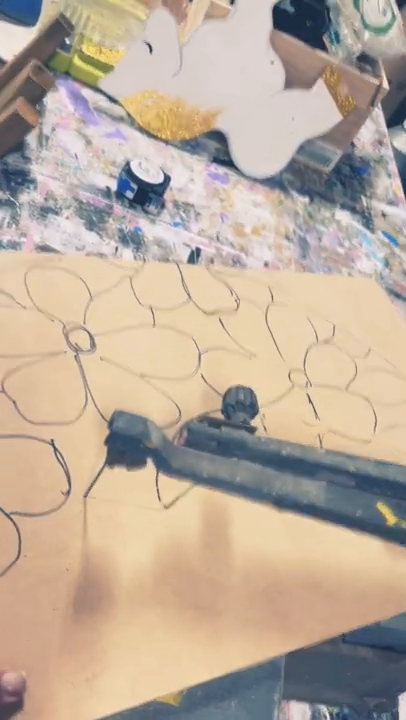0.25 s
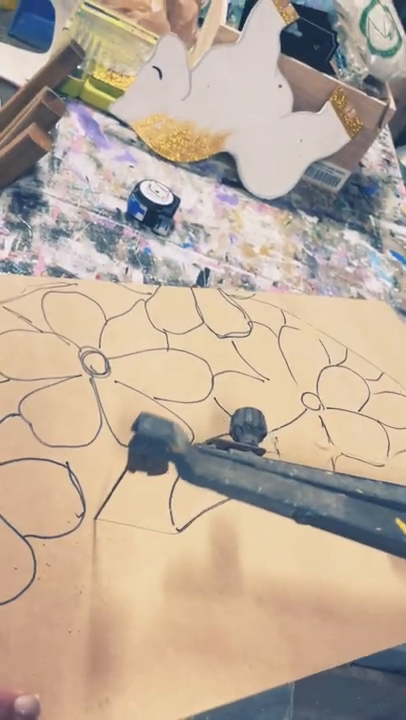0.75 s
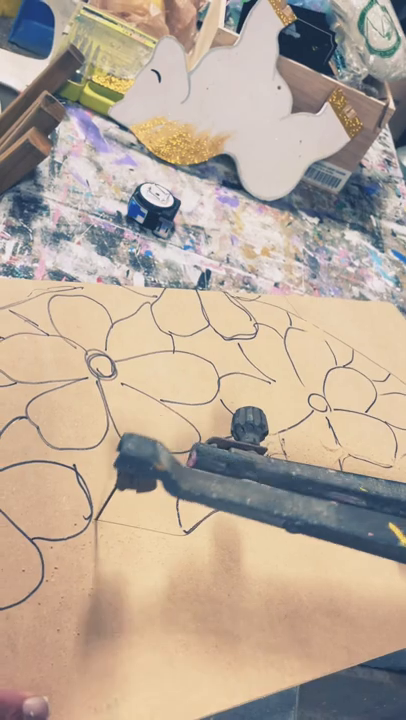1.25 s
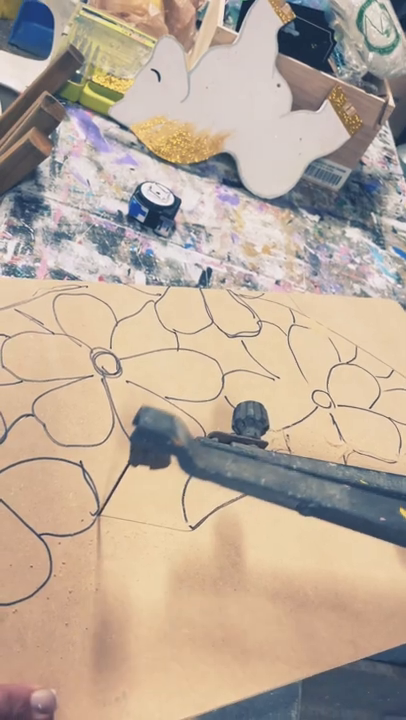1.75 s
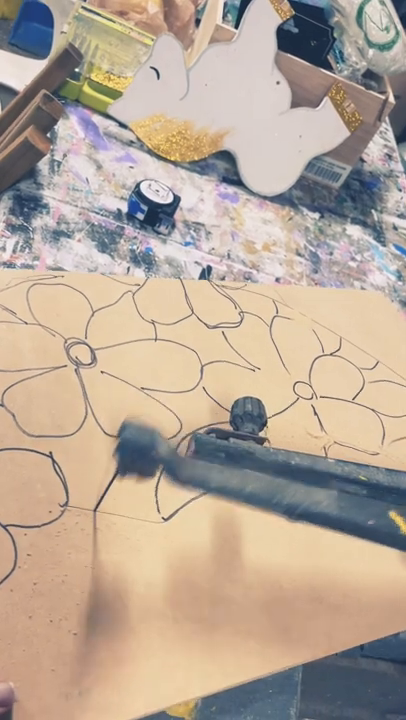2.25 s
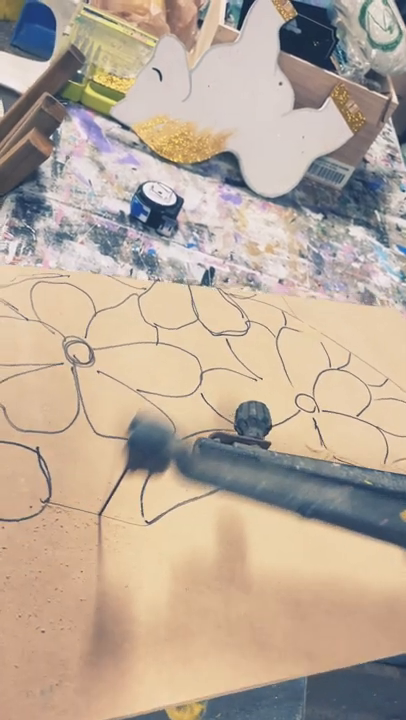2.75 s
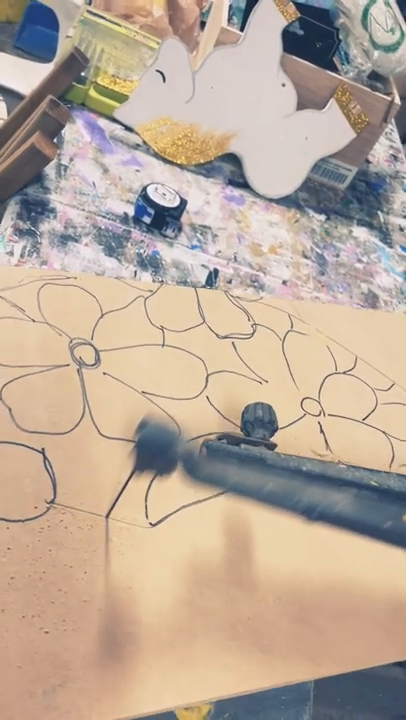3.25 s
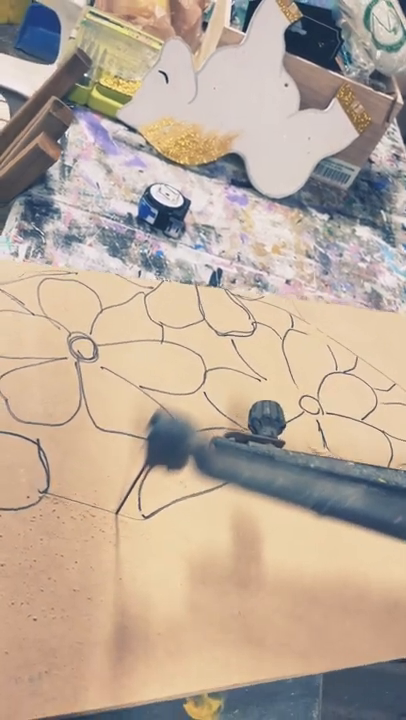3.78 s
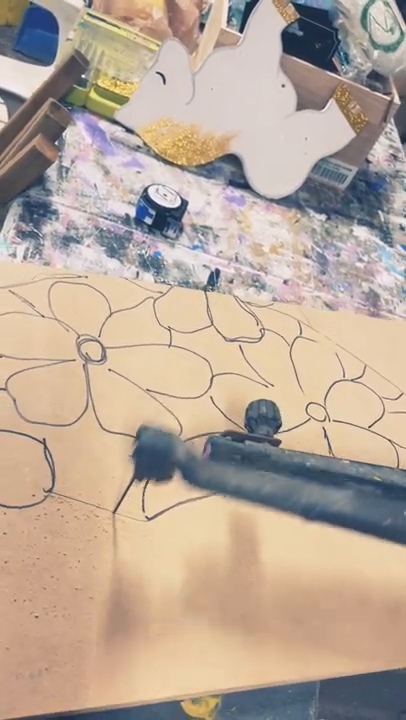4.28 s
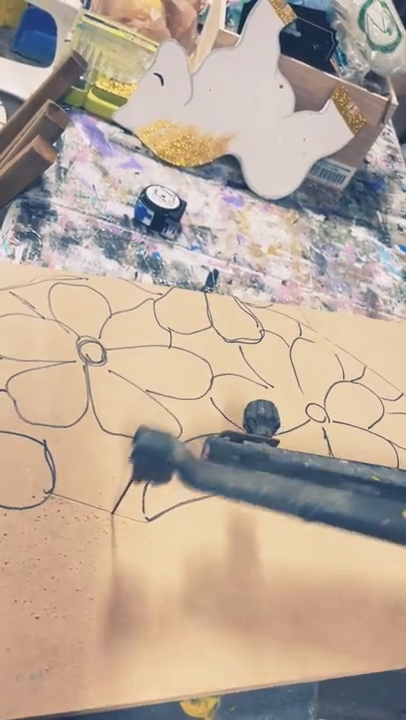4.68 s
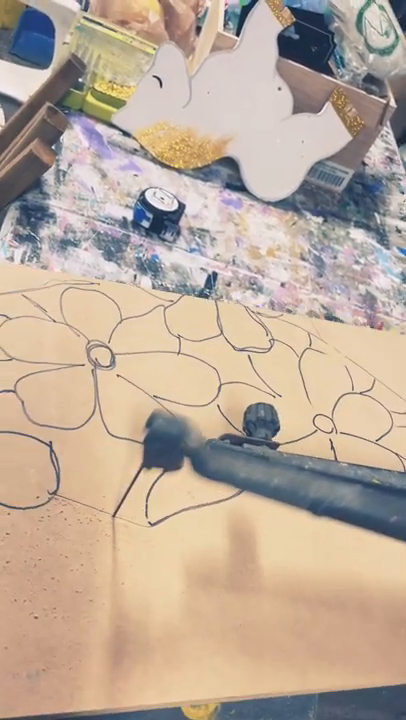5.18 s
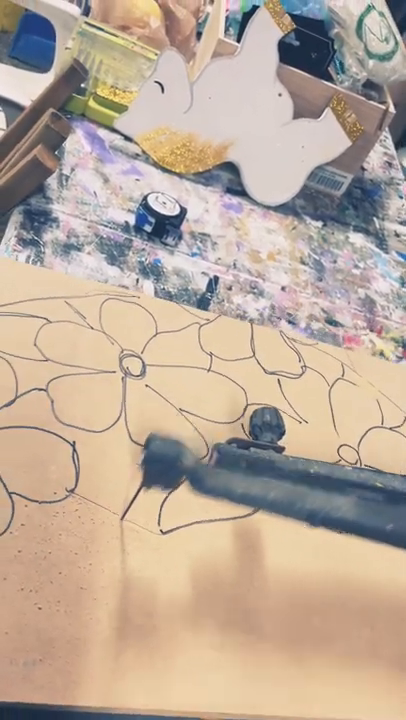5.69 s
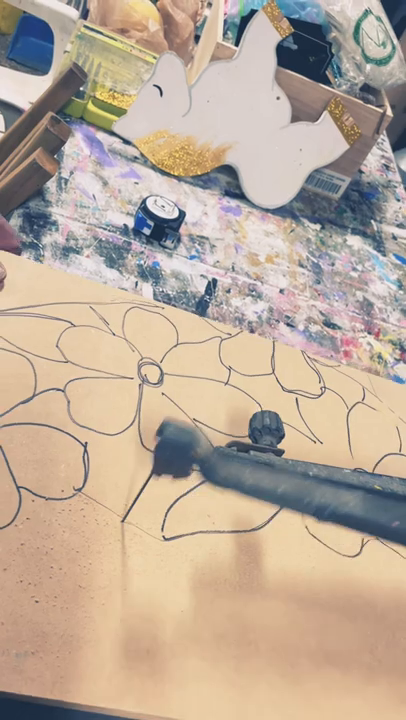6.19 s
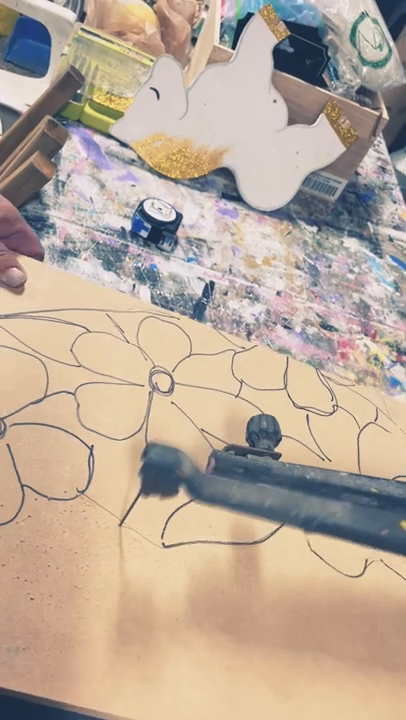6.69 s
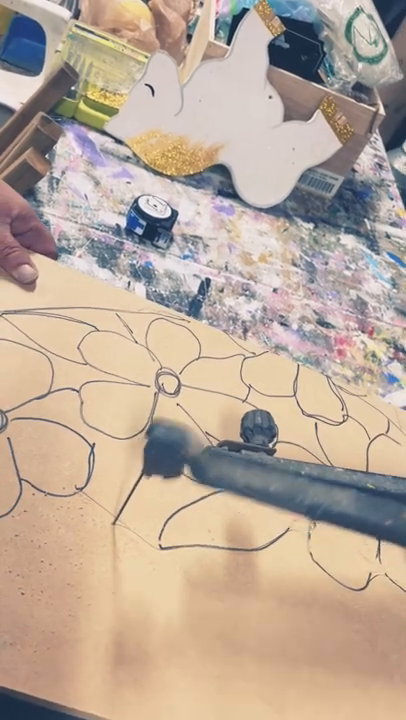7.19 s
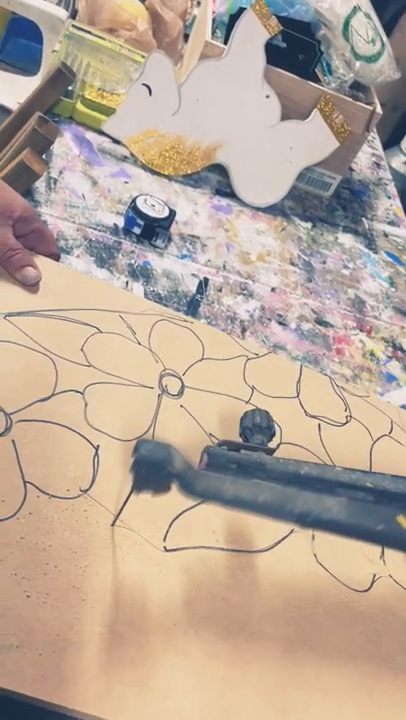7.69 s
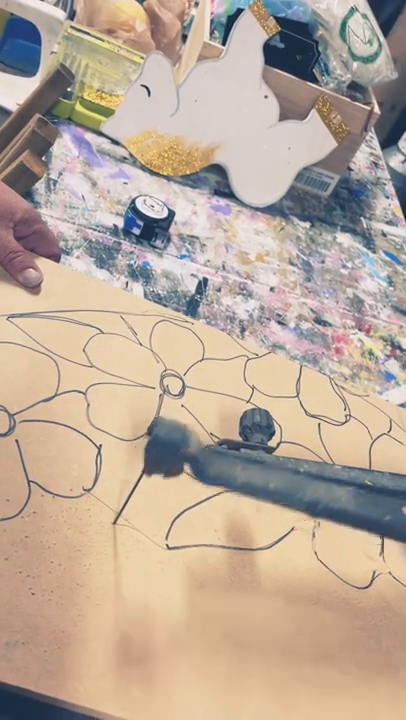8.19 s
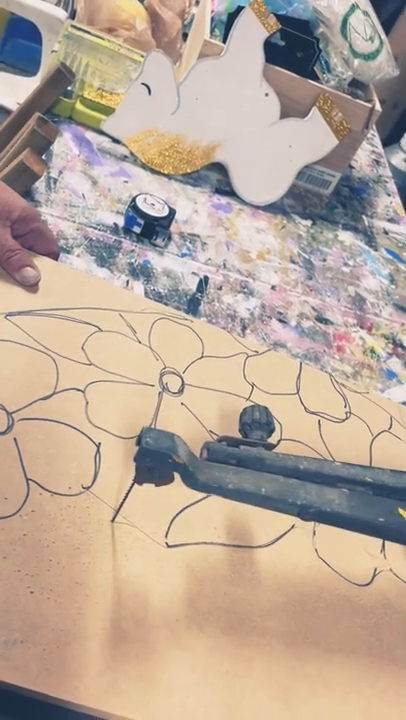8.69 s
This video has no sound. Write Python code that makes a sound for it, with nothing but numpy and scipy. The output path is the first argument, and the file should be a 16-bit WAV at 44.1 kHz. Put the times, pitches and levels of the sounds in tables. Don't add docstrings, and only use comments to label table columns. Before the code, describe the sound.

Fast, coarse wooden rasping at about fifteen strokes a second over a motor hum and loose rattle, pausing mid-way, then stopping with a soft knock.

```python
import sys
import numpy as np
from scipy import signal
from scipy.fft import rfft, irfft, next_fast_len
from scipy.io import wavfile
from scipy.ndimage import uniform_filter1d

SR = 44100
rng = np.random.default_rng(int(sys.argv[2]) if len(sys.argv) > 2 else 0)


def unload_audio(sound):
    columns = np.transpose(np.atleast_2d(sound))
    steps = np.round(np.clip(columns, -1, 1) * 32767)
    wavfile.write(sys.argv[1], SR, steps.astype(np.int16))


def ratio_of_db(decibels):
    return 10 ** (np.asarray(decibels, float) / 20)


N = 394254

# t/s, bite length/ms, push level/dB, side load on the blade/dB
HAND_FEED = [(0, 28, -21, -9), (.35, 24, -22, -7), (.42, 15.6, -22.5, -6.5), (.85, 24.6, -23, -6),
             (1.45, 30, -22.5, -6), (1.6, 22, -27, -4), (1.82, 17, -27.5, -8), (1.9, 3.7, -51.5, -4),
             (3.4, 28, -48.5, 9.5), (3.6, 13, -41, 1), (3.9, 11, -29.5, 1), (4.2, 25, -24.5, 1),
             (4.7, 14, -27.5, -0.5), (5.4, 27, -23.5, 3), (6.5, 15, -26, 2.5), (7.0, 27.5, -23.5, 2.5),
             (7.72, 24.5, -24, 0.5), (8.35, 13, -38.5, 2)]


def rms_one(x):
    return x / np.sqrt(np.mean(x ** 2) + 1e-20)


def in_time(rows):
    s, *columns = np.transpose(rows)
    return [np.interp(np.arange(N) / SR, s, c) for c in columns]


def wander(spread_db, rate_hz, size=N):
    r = np.exp(-2 * np.pi * rate_hz * 40 / SR)
    noise = rng.standard_normal(size // 40 + 2002)
    slow = signal.lfilter([1], [1, -2 * r, r * r], noise)[2000:]
    return np.interp(np.arange(size) / 40, np.arange(len(slow)), ratio_of_db(spread_db * rms_one(slow)))


def coloured(white, spectrum):
    hz = np.maximum(np.fft.rfftfreq(N, 1 / SR), 1)
    points = np.array(spectrum)
    level_db = np.interp(np.log(hz), np.log(points[:, 0]), points[:, 1], left=-80, right=-80)
    return rms_one(irfft(rfft(white) * ratio_of_db(level_db), N))


def resonate(x, hz, width_hz):
    r = np.exp(-np.pi * max(width_hz, 5) / SR)
    poles = [1, -2 * r * np.cos(2 * np.pi * hz / SR), r * r]
    return signal.lfilter([(1 - r * r) / 2, 0, (r * r - 1) / 2], poles, x + 1e-18)


def body(x, modes, wander_db):
    power, out = 0, 0
    for k, (hz, width_hz, db) in enumerate(modes):
        power += ratio_of_db(db) ** 2 * np.pi * width_hz / SR
        struck = x * wander(wander_db, 42.0, size=len(x))
        out = out + (-1) ** k * ratio_of_db(db) * resonate(struck, hz, width_hz)
    return out / np.sqrt(power)


def postures(x, modes, wander_db):
    board_turned = (2.1, 5.29)
    out = []
    for k, part in enumerate(np.split(x, [round(s * SR) for s in board_turned])):
        lie = [(m[0], m[1], m[2 + k]) for m in modes]
        out.append(body(part, lie, wander_db))
    return np.concatenate(out)


def grit(per_s, spread_db):
    sizes = ratio_of_db(spread_db * np.minimum(rng.exponential(1, N), 4)) * rng.choice([-1, 1], N)
    clicks = rms_one(sizes * (rng.random(N) < per_s / SR))
    evened = clicks / (uniform_filter1d(clicks ** 2, size=700) + 0.04) ** 0.7
    return rms_one(evened)


def contact(starts, lengths_ms, levels_db, rise=0.016, fall=0.13):
    force = np.zeros(N)
    for s, ms, db in zip(starts, lengths_ms, levels_db):
        at, size = max(round(s * SR), 0), max(round(ms * SR / 1000), 8)
        shape = np.interp(np.arange(size) / size, [0, rise, 1 - fall, 1], [0.31, 0.91, 0.8, 0.028])
        force[at:at + size] += ratio_of_db(db) * shape[:N - at]
    return force


def looped(source, turns, hold_turns):
    size = SR // 15
    angle = (turns % 1 * size).astype(int)
    age = np.maximum(turns, 0) / hold_turns
    pattern, fade = age.astype(int), np.pi / 2 * (age % 1)
    old, new = source[pattern * size + angle], source[(pattern + 1) * size + angle]
    return np.cos(fade) * old + np.sin(fade) * new


def still_air():
    # f/Hz, level per Hz/dB
    air_spectrum = [(18, -35), (30, 7.5), (80, -14), (117, -3.5), (142, -7.5), (263, -11), (424, -21),
                    (955, -29), (9000, -62), (11700, -99), (19800, -120)]
    return ratio_of_db(-51.5) * coloured(rng.standard_normal(N), air_spectrum)


def workshop(x):
    t60_s, wall_cut_hz, room_db = 0.19, 1330, -18.5
    size = next_fast_len(N + SR)
    w = 2 * np.pi * np.fft.rfftfreq(size)
    dull, out = 1 / (1 + 1j * w * SR / (2 * np.pi * wall_cut_hz)), 0
    for k, lag in enumerate(rng.uniform(.008, .03, 10) * SR):
        loop = ratio_of_db(-60 * lag / SR / t60_s) * dull * np.exp(-1j * w * round(lag))
        out = out + (-1) ** k * loop / (1 - loop)
    return ratio_of_db(room_db) * irfft(out * rfft(x, size), size)[:N]


def ports(x):
    # f/Hz, phase by which left leads/rad
    port_phase = [(1900, 0), (2500, 1.4), (3300, 1.8), (3800, .25), (4800, .4), (5050, -.2), (7100, 3.0),
                  (8400, 3.3), (8900, 3.8), (10200, 6.2), (11600, 6.3), (12400, 7), (13200, 9.15),
                  (15000, 9.6), (15700, 11.2)]
    # f/Hz, left-right level/dB
    port_tilt = [(100, .5), (1100, 1.3), (1900, -.4), (2250, -3), (2900, -1.5), (3400, 2.8), (4300, -2.4),
                 (6500, 0)]
    # f/Hz, level/dB
    housing_scatter = [(60, -20), (1900, -20), (2700, -6), (3400, -3), (4400, -11), (5200, -2), (6500, -8),
                       (7100, -17), (7800, -20), (8500, -12), (9000, -4), (10000, -7), (10500, -13),
                       (11600, -13), (12700, -1), (13400, -9), (14300, -10), (15000, -8), (15600, -8)]
    # t/s, left-right level/dB
    balance = [
        (0, 0.3),
        (4.5, .4),
        (6.3, -.4),
        (7.6, .3),
        (8.4, .1),
        (8.7, 1),
    ]
    size = next_fast_len(N + 4000)
    hz, side = np.fft.rfftfreq(size, 1 / SR), np.array([[1], [-1]])
    lead = np.interp(hz, *np.transpose(port_phase)) / 2
    tilt_db = np.interp(hz, *np.transpose(port_tilt)) / 2
    direct = ratio_of_db(side * tilt_db) * np.exp(1j * side * lead)
    echoes = rng.standard_normal((2, 3900)) * np.exp(-np.arange(3900) / (.017 * SR))
    echoes = echoes / np.sqrt(np.sum(echoes ** 2) / 2)
    scatter = rfft(echoes, size) * ratio_of_db(np.interp(hz, *np.transpose(housing_scatter)))
    heard = irfft(rfft(x, size) * (direct + scatter), size)[:, :N]
    return heard * ratio_of_db(side * in_time(balance)[0] / 2)


def rustles():
    # t/s, length/ms, level/dB, f/Hz, width/Hz
    rubs = [(1.6, 17.5, -31, 1250, 280), (1.742, 11.7, -30, 1000, 560), (1.6, 16.1, -34, 1500, 450),
            (3.86, 570, -43, 1070, 400), (3.9, 22, -37.5, 1000, 200), (4.2, 20, -31, 1010, 160),
            (3.62, 16, -35, 1080, 200), (3.648, 22, -33, 1000, 160), (3.716, 20, -35, 1020, 160),
            (4.2, 14, -40.5, 1600, 180), (3.782, 10, -35, 1050, 200), (3.4, 21, -37, 1050, 170),
            (5, 13, -34, 1050, 200), (8.655, 60, -80, 5000, 900), (8.723, 42, -75, 3500, 100),
            (8.722, 82, -69.5, 2400, 1900), (8.43, 30, -57, 1800, 2315), (8.878, 3.5, -60, 3000, 4300),
            (8.444, 5.9, -42.5, 260, 170), (8.623, 4, -80, 5300, 900), (8.81, 5, -67.5, 2700, 540),
            (8.89, 22, -62, 3150, 130), (8.89, 19, -59, 3900, 400), (8.89, 23, -68, 5300, 640),
            (8.931, 16, -35.5, 226, 77), (8.932, 14, -69, 360, 150)]
    rub, out = grit(6000, 3.2), 0
    for s, ms, db, hz, width_hz in rubs:
        once = resonate(rub * contact([s], [ms], [db]), hz, width_hz)
        out = out + resonate(once, hz, 2 * width_hz) * np.sqrt(SR / width_hz / 2)
    return out


def crank():
    loaded_per_s, free_per_s, start_turn = 14.99, 15.163, -.21
    free_from_s, free_to_s, off_s, coast_s = 1.6, 3.8, 8.25, .16
    t = np.arange(N) / SR
    driven = np.where((t > free_from_s) & (t < free_to_s), free_per_s, loaded_per_s)
    speed = driven * np.exp(-np.maximum(t - off_s, 0) / coast_s)
    return start_turn + np.cumsum(speed) / SR, speed / loaded_per_s


def running(speed):
    # t/s, hum level/dB, frame shake level/dB
    idle_levels = [(0, -50, -38), (.45, -56, -41), (1.0, -43, -39), (1.1, -59, -39), (1.32, -44, -39),
                   (1.87, -56, -44), (2.23, -42.5, -40.5), (2.64, -48, -36), (3.11, -43.5, -40.5),
                   (3.37, -48.5, -37.5), (3.69, -41, -37.5), (4.17, -45, -36), (4.74, -47, -38.5),
                   (5.58, -43.5, -36.5), (6.59, -46.5, -39.5), (7.14, -47.5, -38), (7.71, -45.5, -39),
                   (8.21, -51.5, -42)]
    stall_s, stall_db_per_s = 8.375, 187
    hum_db, shake_db = in_time(idle_levels)
    speed_db = 20 * np.log10(speed)
    stall_db = stall_db_per_s * np.maximum(np.arange(N) / SR - stall_s, 0)
    hum_db = hum_db + 1.7 * speed_db - stall_db / 2
    rattle_db = shake_db + 0.3 * speed_db - stall_db
    rumble_db = rattle_db - 1
    guide_db = -54.5 + 0.56 * (shake_db + 38) + 2 * speed_db - stall_db
    return hum_db, rumble_db, rattle_db, guide_db


def machine(turns, load, hum_db, rumble_db, rattle_db, guide_db):
    hum_partials = [(4, -12), (5, -16.5), (6, -18), (7, -7.5), (8, 4.5), (9, -9), (10, -11.5), (12, -19),
                    (13, -1.5), (14, -9), (16, -3.5), (18, -8.5), (19, -8), (20, -5.5)]
    # f/Hz, level per Hz/dB
    rumble_spectrum = [(25, -40), (50, -12.5), (100, -2.5), (200, 0), (320, 1.5), (500, -8), (900, -33.5),
                       (2000, -60.5)]
    # f/Hz, width/Hz, level/dB
    frame_modes = [(529, 71, 0.5), (982, 246, 2.5), (1560, 320, -5), (2205, 440, -1.5), (3600, 280, -6.5),
                   (4070, 360, -5.5), (4764, 615, -4.5), (5215, 810, -7), (6710, 760, -10),
                   (8060, 1430, -17)]
    # f/Hz, width/Hz, level/dB
    guide_modes = [(9210, 1100, -3.5), (10120, 4600, -12), (11730, 420, -12.5), (15300, 810, -5.5)]
    hum = 0
    for k, db in hum_partials:
        hum = hum + ratio_of_db(db) * wander(1.5, 1.7) * np.sin(2 * np.pi * (k * turns + rng.random()))
    linkage = looped(rng.standard_normal(N), turns, hold_turns=5.0) + .8 * rng.standard_normal(N)
    rumble = coloured(linkage, rumble_spectrum) * wander(0.52, 24)
    swell_db = 1.8 * np.cos(2 * np.pi * (turns - .1)) + 2.1 * np.cos(4 * np.pi * (turns - .05))
    rattle = body(grit(3000, 2.8) * ratio_of_db(swell_db), frame_modes, wander_db=1.5)
    slide_db = 4.1 * np.cos(2 * np.pi * (turns + 0.04)) + 4.4 * np.cos(4 * np.pi * (turns + 0.24))
    guide = body(grit(4000, 6.1) * ratio_of_db(slide_db), guide_modes, wander_db=4.0)
    calm = ratio_of_db(load * 0.5 * np.cos(2 * np.pi * (turns - 0.1)))
    shaken = calm * (ratio_of_db(rumble_db + 2.0) * rumble + ratio_of_db(rattle_db) * rattle)
    return ratio_of_db(hum_db - 2.0) * hum + shaken + ratio_of_db(guide_db + 4.5) * guide


def bites(turns):
    # t/s, bite length/ms, extra level/dB
    single_strokes = [(0.069, 24.4, 0), (0.135, 28.6, -1), (0.201, 25, 1), (0.271, 26.7, -0.5),
                      (0.334, 24.7, 0.5), (0.406, 16, 1.5), (0.473, 17.6, -3), (0.671, 17.5, 0.5),
                      (1.07, 23, -1), (1.333, 27, 0.5), (1.468, 29.7, -2), (1.607, 15, -1.5),
                      (1.674, 14, 0), (1.741, 9.5, -4.5), (1.807, 12, -4), (3.922, 18, -1),
                      (4.049, 20.5, 0.5), (4.116, 18.5, 2.5), (4.179, 25, -0.5), (4.248, 22.6, 1),
                      (4.315, 18, 1.5), (4.382, 22, 0), (4.449, 19, -0.5), (4.581, 22, -4), (4.715, 18, 0),
                      (4.782, 18, -1.5), (4.847, 18.5, 0.5), (5.181, 18, -3), (5.315, 20.4, 0.5),
                      (5.381, 20, 0), (5.446, 21.3, 1), (5.578, 26, -2), (5.715, 23.7, -0.5),
                      (5.781, 20.6, -1), (5.849, 19.4, -1), (5.915, 22, -1.5), (5.981, 25, -1.5),
                      (6.048, 23, -1.5), (6.115, 22.6, -2), (6.317, 21, -0.5), (6.45, 21, -1.5),
                      (6.516, 20, 0.5), (6.583, 21, -1.5), (6.649, 19.6, -1.5), (6.716, 23, -2),
                      (6.782, 22, -2), (6.847, 21.4, -1), (6.98, 28, -2.5), (7.113, 23, 0),
                      (7.312, 27.4, -1), (7.382, 20, -0.5), (7.447, 23, 0.5), (7.512, 25.7, -1.5),
                      (7.58, 17, 0.5), (7.646, 26, 1), (7.714, 23.7, 1.5), (7.85, 21, -0.5),
                      (7.919, 18.6, 1.5), (7.984, 19, 0.5), (8.051, 15, 1.5),
                      (0.539, 18, -4), (0.604, 13.7, 2.5), (0.734, 20.4, 1.5), (0.798, 29.6, -0.5),
                   (.866, 23.5, 2), (.934, 20.5, 2.5), (1.139, 17, -1), (1.205, 15.6, -1), (1.265, 31, 0),
                   (1.4, 27.6, 0), (1.539, 17.2, 2.5), (2.522, 13, 14.5), (2.865, 11.6, 14),
                   (2.932, 8.1, 19.5), (2.998, 9.6, 13), (3.065, 9.8, 10.5), (3.385, 14, 4), (3.452, 18, 4),
                   (3.515, 24, 1), (3.582, 18, 6), (3.648, 18, -1), (3.716, 16, -5), (3.782, 9.6, -5),
                   (3.858, 7, 3), (4.516, 14.5, 0.5), (4.913, 23, 0.5), (4.979, 20.5, 1.5), (5.046, 16, 4),
                   (5.111, 27.6, -2.5), (5.249, 16, -3), (5.509, 28, -1.5), (6.184, 13.7, 1),
                   (6.25, 14.8, 0), (6.912, 28, -1), (7.177, 27, -0.5), (7.246, 19, 2), (8.346, 25, -3)]
    # t/s, level/dB
    plate_drag = [(0, -1), (.6, 0), (1.4, -1), (1.8, 4), (4.0, -1.5), (4.6, 0), (4.9, -6), (5.2, -3),
                  (5.4, 2), (5.7, 1.5), (6.2, -1.5), (6.6, 2.5), (7.0, -2), (7.3, 1), (7.8, 2), (8.1, -5)]
    bite_turn, length_spread, jitter_s = .005, 0.13, 0.0012
    whole = np.arange(126)
    middle = np.searchsorted(turns, whole + bite_turn) / SR
    chance = rng.standard_normal((len(whole), 5))
    ms, push_db, side_db = (c[(middle * SR).astype(int)] for c in in_time(HAND_FEED))
    ms = ms * np.exp(length_spread * chance[:, 0])
    s = np.maximum(middle - ms / 2000 + jitter_s * chance[:, 1], 0)
    for at, bite_ms, extra_db in single_strokes:
        k = np.argmin(abs(middle - at - bite_ms / 2000))
        s[k], ms[k] = at, bite_ms
        push_db[k] += extra_db
        chance[k, 2:4] = 0
    board_db = push_db - 2.5 * chance[:, 2]
    blade_db = push_db + side_db - 0.35 * chance[:, 3]
    thump_db = -25 + 0.9 * (push_db + side_db / 2 + 25) + 0.5 * (ms - 22)
    thump_db = thump_db + np.interp(middle, *np.transpose(plate_drag)) + chance[:, 4]
    return s, ms, board_db, blade_db, thump_db


def thumps(turns, strokes):
    # f/Hz, width/Hz, then level/dB before the board is turned, after, once turned again
    plate_modes = [(241, 25.7, -1, -2.5, -0.5), (290.2, 29, -8, 0.5, 0), (197.5, 42, -9, -11, -8),
                   (258.6, 29, 3.5, -9.5, -0.5), (354, 25, -10.5, -10, -9.5)]
    s, ms, _, _, thump_db = strokes
    middle = ((s + ms / 2000) * SR).astype(int)
    blows = np.zeros(N)
    blows[np.searchsorted(turns, np.round(turns[middle]) - .03)] = ratio_of_db(thump_db + 24.0)
    blows = signal.sosfilt(signal.butter(2, 420, fs=SR, output="sos"), blows)
    rough = looped(grit(980, 0.48), turns, hold_turns=9.15) * contact(s + 0.0039, ms * .96, thump_db - 7.5)
    return postures(blows, plate_modes, wander_db=1.0) + postures(rough, plate_modes, wander_db=1.5)


def teeth(turns, strokes):
    # f/Hz, width/Hz, then level/dB before the board is turned, after, once turned again
    board_modes = [(367.4, 21, 2.5, -1, -1), (582, 49.4, -1, 1.5, 1), (693, 56, -2, -9.5, -5.5),
                   (819, 93, 0, -2, -1), (862, 75, 4.5, -8.5, -8), (1008, 75, -5.5, -9, -4),
                   (1107, 127, -2.5, -2, -2.5), (1210, 121, -2.5, -6, -3), (1335, 71, -0.5, -6, -2),
                   (1591, 97, -4.5, -6, -7.5)]
    # f/Hz, width/Hz, then level/dB before the board is turned, after, once turned again
    blade_modes = [(1804, 95, -2, -3, -4.5), (2110, 85, 6, -2.5, -0.5), (2235, 49, 2, -25, -11.5),
                   (2371, 138, -6, 5, 0.5), (2611, 93, -16, -4.5, -0.5), (2521, 216, -4, 0, 1),
                   (1990, 960, -18.5, -9.5, -8), (3195, 95, -4.5, -6.5, -27),
                   (3328, 130, -24, -14.5, -12.5), (3612, 94, -2, -7, -9.5), (4300, 720, -4.5, -7.5, -6.5),
                   (4604, 470, -4, -3, -3), (5290, 170, -7.5, -10.5, -38.5), (6180, 930, -9, -12.5, -16)]
    # f/Hz, width/Hz, level/dB
    tip_modes = [(7900, 330, 4), (7850, 720, -3.5), (9080, 420, -13), (12230, 740, -25.5),
                 (14200, 330, -17), (15300, 230, 1)]
    # t/s, level/dB
    tip_levels = [
        (0, -64.5),
        (1.8, -67),
        (2.9, -62),
        (3.8, -60),
        (4.4, -56.5),
        (5.5, -56),
        (6.1, -59),
        (6.7, -61),
        (7.8, -67),
        (8.4, -84),
    ]
    # t/s, peak level/dB
    tooth_catches = [(0.0252, -11), (0.078, -27), (0.211, -20), (0.3444, -16), (0.4178, -11), (0.6092, -20),
                     (0.8095, -14), (1.3566, -20), (2.869, -15), (2.9348, -5.5), (3.9283, -5), (3.994, -4),
                     (4.0609, -17), (4.193, -18), (4.253, -15), (4.2602, -18), (4.3242, -10), (4.3864, -13),
                     (4.3987, -2.5), (4.9173, -14), (4.9844, -10), (4.9972, -14), (5.0515, -25),
                     (5.1183, -9), (5.1933, -15.5), (5.3185, -26), (5.3858, -5), (5.4652, 0), (5.5237, -3),
                     (5.6631, -10.5), (5.7327, -5), (5.7876, -17), (5.8009, -17), (5.9202, -8),
                     (6.1201, -18.5), (6.1866, -23), (6.2525, -10.5), (6.5907, -14), (6.7283, -11.5),
                     (6.9197, -13), (6.9252, -5), (6.9326, -15), (7.0671, -9), (7.1204, -4), (7.1793, -3),
                     (7.1873, -20), (7.2, -13.5), (7.2535, -16.5), (7.322, -4), (7.3285, -15), (7.3341, -23),
                     (7.388, -13), (7.4, -13), (7.4526, -17.5), (7.5338, -9), (7.59, -8), (7.601, -14),
                     (7.6543, -8), (7.7223, -14), (7.9329, -15),
                     (0.137, -9), (0.274, -9), (0.476, -18), (0.542, -11), (0.674, -17), (0.734, -22),
                     (0.741, -9), (0.755, -19), (0.815, -19), (0.869, -17), (0.883, -13), (0.89, -20),
                     (0.939, -14), (0.944, -21), (1.017, -9), (1.073, -19), (1.14, -13), (1.209, -19),
                     (1.217, -19), (1.268, -17), (1.277, -14), (1.288, -14), (1.334, -16), (1.342, -12),
                     (1.401, -11), (1.413, -12), (1.423, -24), (1.47, -25), (1.542, -25), (1.609, -15),
                     (3.86, -16), (5.397, -10), (5.511, -8)]
    s, ms, board_db, blade_db, _ = strokes
    fresh = grit(2000, 3.08)
    slams = rng.normal(0, 1, (len(s), 2))
    slam_in = ((s + ms * .00012) * SR).astype(int) + 50
    fresh[slam_in] += 1.1 * np.sign(slams[:, 0]) * ratio_of_db(2.6 * slams[:, 0])
    rip_out = ((s + ms * .0008) * SR).astype(int)
    fresh[rip_out] += 4.6 * slams[:, 1]
    at, peak_db = np.transpose(tooth_catches)
    fresh[(at * SR).astype(int) - 8] = ratio_of_db(peak_db + 29) * np.sign(slams[:len(at), 1])
    same = looped(grit(900, 3.6), turns, hold_turns=6.012)

    tip_force = contact(s, ms * 0.77, blade_db * 0.25, rise=0.11, fall=0.24)
    tip_gain = ratio_of_db(in_time(tip_levels)[0] + 32.5)
    out = body(fresh * tip_force * tip_gain, tip_modes, wander_db=5.5)
    board = (board_modes, board_db + 0.5, 0.82 * fresh + 0.77 * same, .1, .3, -7)
    blade = (blade_modes, blade_db + 1.17, fresh, .22, .08, -22)
    for modes, db, clicks, rise, fall, tail_db in (board, blade):
        bite = contact(s - .0015, ms * 0.94, db, rise, fall)
        rebound = contact(s + ms / 1000 + 0.013, ms * 0.49, db - 13, rise=0.22, fall=0.82)
        rasp = contact(s + ms / 1400, ms * 0.19 + 22, db + tail_db, rise=0.14, fall=0.7)
        out = out + postures(clicks * (bite + rebound + rasp), modes, wander_db=1.67)
    return out


def scene():
    turns, speed = crank()
    strokes = bites(turns)
    load = np.clip((in_time(HAND_FEED)[1] + 40) / 12, 0, 1)
    cut = teeth(turns, strokes) + thumps(turns, strokes)
    saw = cut + machine(turns, load, *running(speed)) + rustles()
    return ports(saw + workshop(saw) + still_air())


def low_pass(x):
    return signal.sosfilt(signal.butter(12, 17150, fs=SR, output="sos"), x)


def record(dry):
    cut = signal.sosfilt(signal.butter(4, 50, "high", fs=SR, output="sos"), dry)
    cut = signal.sosfilt(signal.cheby2(16, 75, 16100, fs=SR, output="sos"), cut)
    return low_pass(cut)


dry = scene()
out = record(dry)
unload_audio(out)
```